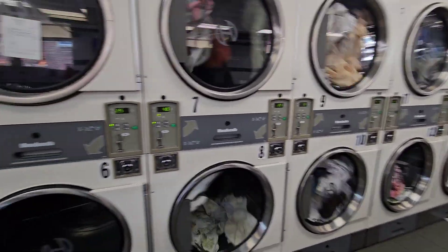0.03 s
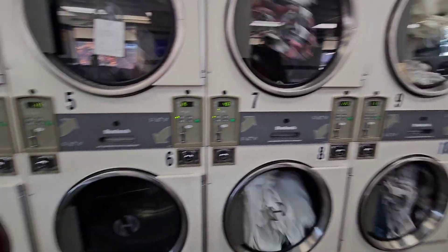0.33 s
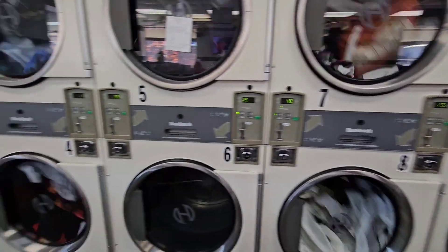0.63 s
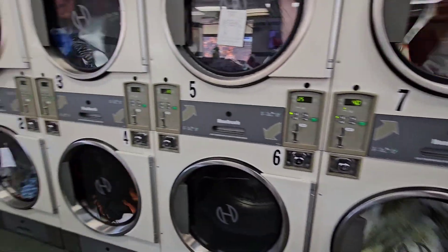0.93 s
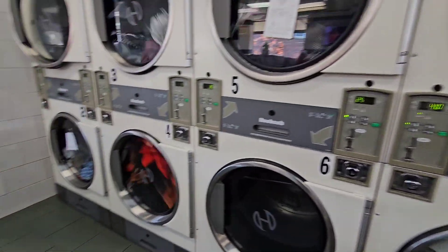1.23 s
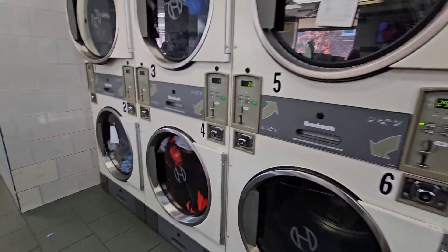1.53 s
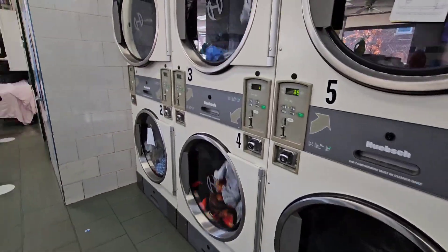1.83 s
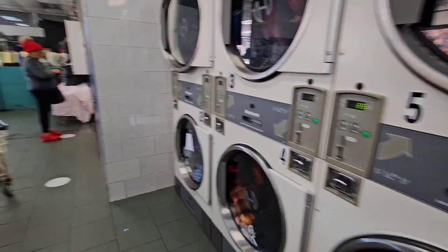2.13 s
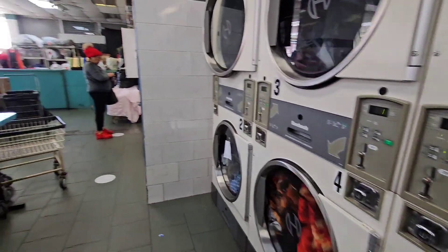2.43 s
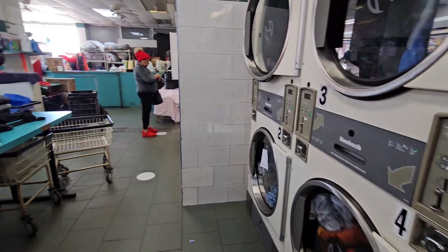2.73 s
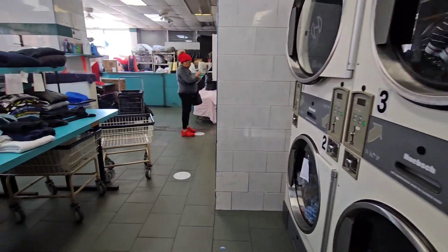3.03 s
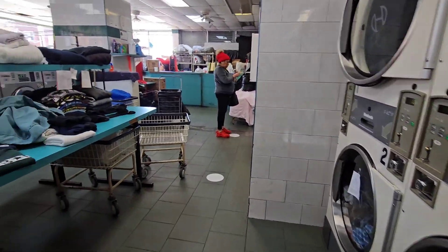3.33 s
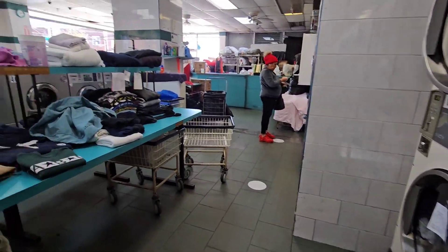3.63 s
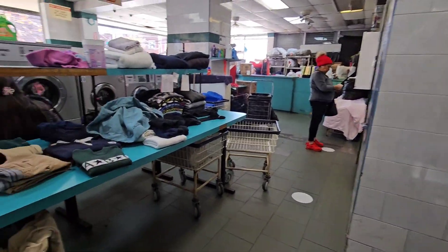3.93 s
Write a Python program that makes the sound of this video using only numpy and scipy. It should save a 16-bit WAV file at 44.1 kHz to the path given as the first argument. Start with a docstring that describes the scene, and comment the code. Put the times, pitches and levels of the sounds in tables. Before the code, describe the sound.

Tumble dryers rumble and hum steadily, with a light metallic jingle near the end.

```python
"""A walk along a row of tumble dryers in a tiled laundromat.
From the start, motors drone against the mains hum, drums rumble and air rushes through the ducts.
Laundry thuds and swishes, buttons tick, and faint blower tones swell as each machine is passed.
Past halfway a panel buzzes in surges and a bright hiss grows.
Near the end, after a few stray clinks, small metal things, perhaps coins, jingle."""
import sys
import numpy as np
from scipy import signal
from scipy.fft import rfft, irfft
from scipy.io import wavfile

SR = 44100
rng = np.random.default_rng(int(sys.argv[2]) if len(sys.argv) > 2 else 0)


def waveform_to_disk(signal):
    """Save audio, clipped to [-1, 1], as 16-bit WAV at the path in sys.argv[1]."""
    frames = np.transpose(np.atleast_2d(signal))
    scaled = np.clip(frames, -1, 1) * 32767
    samples = np.round(scaled).astype(np.int16)
    wavfile.write(sys.argv[1], SR, samples)


N = 176400


def motors():
    """Spinning shafts drone, motors beat against the mains hum, and a shaken panel buzzes."""
    # drone at the rate the shaft turns (time [s], level [dB])
    drone_levels = [(0, -29.5), (.6, -26.5), (1.05, -27), (1.3, -25), (1.9, -23), (2.7, -21.5),
                    (2.9, -26.5), (3.45, -23.5), (3.95, -30.5)]
    # hum near twice the shaft and mains rates, swelling and breaking up (time [s], level [dB])
    hum_levels = [(0, -29.5), (.14, -32.5), (.22, -27), (.38, -23), (.5, -43.5), (.56, -25), (.68, -41),
                  (.79, -29), (.92, -41), (1.02, -27.5), (1.17, -23.5), (1.27, -47), (1.48, -31),
                  (1.63, -26.5), (1.75, -32.5), (1.84, -31), (2.02, -36), (2.08, -25.5), (2.2, -37),
                  (2.37, -22.5), (2.45, -40), (2.53, -27), (2.62, -35), (2.68, -23.5), (2.76, -24.5),
                  (2.83, -30.5), (3.03, -28.5), (3.1, -29), (3.19, -28), (3.32, -39), (3.42, -26.5),
                  (3.55, -24), (3.69, -33), (3.92, -23.5), (3.96, -31)]
    # surges of the panel's buzz (time [s], level [dB])
    buzz_levels = [(0, -47.5), (1.4, -48), (2.3, -41.5), (2.46, -46.5), (2.54, -33), (2.66, -42.5),
                   (2.78, -32.5), (2.87, -39), (2.95, -35), (3.2, -40), (3.28, -38.5), (3.35, -47),
                   (3.44, -36.5), (3.55, -36.5), (3.65, -42.5), (3.95, -48)]
    shaft_hz, mains_hz, hum_hz = 58.7, 60, 119.4
    drone = tone(shaft_hz, wander=.0023, rate=2.2) * gain(curve(drone_levels) + .46 * drift(12))
    hum = tone(hum_hz, wander=.0083, rate=5.2) * gain(curve(hum_levels))
    buzz = tone(6 * mains_hz, wander=.006, rate=12) * gain(curve(buzz_levels) + 2.3 * drift(12))
    return (drone + hum + buzz) * pan(.7)


def drums():
    """The turning drums make a deep, slightly uneven rumble."""
    # tone colour of the rumble (frequency [Hz], relative level [dB])
    rumble_colour = [(15, -24), (25, -6), (36, 1), (55, 1.5), (80, -.5), (100, -1), (125, -1.5), (145, -2),
                     (180, -1.5), (275, -6), (380, -5), (450, -13.5), (600, -17), (800, -30.5),
                     (1400, -47.5)]
    # loudness along the row (time [s], level [dB])
    rumble_levels = [(0, -28), (.8, -28.5), (1.4, -26.5), (2.1, -28), (2.7, -28), (3.3, -28), (3.95, -28)]
    return flickering_noise(rumble_colour, flicker_db=.97, rate=4.1) * gain(curve(rumble_levels))


def air():
    """Air rushes through ducts and whistles through gaps; a hiss fades, then grows down the row."""
    # tone colour of the rush (frequency [Hz], relative level [dB])
    rush_colour = [(300, -2.5), (700, 6), (900, 2), (1050, 2.5), (1180, 0), (1550, 0.5), (1800, -2.5),
                   (2050, -2), (3100, -7), (4000, -5.5), (4800, -6), (6000, -5.5), (6800, -7.5),
                   (7350, -7.5), (7900, -11.5), (8800, -10.5), (9600, -20), (10800, -15), (12200, -13),
                   (13800, -32), (15800, -31)]
    # thin whistles (pitch [Hz], level [dB], width [octaves])
    gaps = [(1032, -56, 0.027), (2000, -61.5, 0.022), (2493, -70.5, 0.0036), (2730, -69.5, 0.0027),
            (4700, -61, 0.022), (7390, -61.5, 0.017)]
    # tone colour of the hiss (frequency [Hz], relative level [dB])
    hiss_colour = [(2000, -9.5), (3500, -3.5), (5000, 2.5), (6500, -2), (8500, -4), (9800, -13),
                   (12000, -4.5), (15500, -13)]
    # loudness of the hiss (time [s], level [dB])
    hiss_levels = [(0, -47.5), (1.5, -60), (2.2, -53), (2.6, -48), (3.15, -48), (3.5, -44.5), (3.95, -47)]
    rush = flickering_noise(rush_colour, flicker_db=.92, rate=8.3) * gain(-41.5)
    jets = room_noise()
    whistles = sum(gain(db) * filtered(jets, band(hz, octaves)) for hz, db, octaves in gaps)
    hiss = filtered(room_noise(), colour(hiss_colour)) * gain(curve(hiss_levels))
    return rush + whistles + hiss


def laundry():
    """Falling laundry lands with soft thuds, and cloth swishes over the drum wall."""
    # loads landing (time [s], level [dB], centre frequency [Hz])
    thuds = [(.29, -35, 312), (.66, -37, 180), (1.33, -31, 228), (1.99, -33.5, 280), (2.55, -34, 327),
             (3.46, -35, 195), (3.88, -32.5, 175)]
    # cloth sliding (time [s], level [dB], centre frequency [Hz], width [octaves], half length [s])
    swishes = [(0.493, -45.5, 2200, 1.2, 0.023), (1.153, -46, 1500, 0.5, 0.026),
               (1.143, -46.5, 5770, 0.56, 0.019), (1.37, -45, 620, .3, .05),
               (1.767, -48, 4000, 0.89, 0.035), (1.865, -48.5, 6900, 0.16, 0.055),
               (2.107, -47, 6700, 0.2, 0.033), (2.46, -51, 4770, .08, 0.06), (2.487, -52, 11900, .06, .04),
               (2.496, -46, 6700, .33, 0.032), (2.512, -47.5, 1580, 0.51, 0.067),
               (3.335, -52, 2250, .2, .025), (3.46, -48, 6600, 0.12, .02), (3.78, -51, 2200, .2, .025)]
    rise_s, fall_s = .034, .027
    t, out = times(), 0
    thud_noise, swish_noise = room_noise(), room_noise()
    for at, db, hz in thuds:
        swell = bell(t - at, np.where(t < at, rise_s, fall_s))
        out += gain(db) * swell * filtered(thud_noise, band(hz, octaves=.28))
    for at, db, hz, octaves, half_length in swishes:
        out += gain(db) * bell(t - at, half_length) * filtered(swish_noise, band(hz, octaves))
    return out


def coins():
    """Small metal things strike, scrape and ring; the tiled room holds the ring a little longer."""
    # clinks (time [s], level [dB], favoured pitch [Hz], relative scrape [dB], relative strike [dB])
    clinks = [(.474, -49, 13600, 1, -4), (2.27, -56, 12600, 1, -10), (2.742, -49, 15100, -5, -2),
              (3.13, -51, 14400, -4, -6), (3.318, -50, 12600, 2, -12), (3.341, -40.5, 14100, 2.5, -3),
              (3.358, -46, 13600, -6, -8), (3.409, -42, 12600, -5, 1), (3.492, -38, 12950, -1, 1),
              (3.506, -33.5, 8900, -8, -4), (3.509, -41, 14100, -6, -8), (3.518, -41, 9530, 1, -2),
              (3.682, -37, 13400, -16, -14), (3.719, -34.5, 14150, -12, 10), (3.731, -40, 14300, -6, -2),
              (3.777, -39, 14100, -2, -3), (3.78, -43.5, 9530, -10, -4), (3.799, -41, 12600, -4, -4),
              (3.858, -39, 10850, -12, -10), (3.876, -39, 12600, -10, -12), (3.885, -37, 8100, -10, -1),
              (3.889, -38, 12900, -3, 1), (3.95, -42.5, 10850, -6, -6)]
    # notes the metal rings with (pitch [Hz], relative level [dB], time to fade by 60 dB [s])
    notes = [(7330, -5, .12), (7800, 0, 0.096), (8500, -8, .12), (9517, -4.5, .13), (10844, -5.5, 0.13),
             (12578, -1.5, 0.15), (12913, -9, 0.099), (14200, -5, 0.11), (14400, -7, .07)]
    # tone colour of metal scraping on metal (frequency [Hz], relative level [dB])
    scrape_colour = [(2000, -12), (4500, 0), (8000, -2), (10000, -7), (12600, 3), (15500, -4)]
    strike_s, scrape_s, room_s = .017, .21, .5  # times to fade by 60 dB
    rise_s, detune, favoured_octaves = .0012, .0008, .17
    out = np.zeros((2, N))
    scrape_noise = filtered(room_noise(), colour(scrape_colour))
    room = room_noise()
    chatter = normalise(gain(1.5 * drift(120)))  # the level trembles quickly
    echoes = [gain(-3.5) * filtered(room, band(hz, octaves=.012)) for hz, _, _ in notes]
    for at, db, pitch, scrape_db, strike_db in clinks:
        start = min(int(at * SR), N - 1)
        age = np.arange(N - start) / SR
        strike_noise = filtered(room, band(pitch, octaves=.043))[:, start:]
        metal = gain(strike_db) * strike_noise * fade(age, strike_s)
        room_tail = gain(-15) * fade(age, room_s)
        for echo, (hz, note_db, ring_s) in zip(echoes, notes):
            detuned_hz = hz * (1 + detune * rng.standard_normal())
            ring = np.sin(2 * np.pi * (detuned_hz * age + rng.random((2, 1))))
            ring += random_stretch(echo, start)
            # notes far from the favoured pitch ring less
            strength = gain(note_db) / (1 + (2 * np.log2(hz / pitch) / favoured_octaves) ** 2)
            metal += strength * ring * np.hypot(fade(age, ring_s), room_tail)
        scrape = gain(scrape_db) * random_stretch(scrape_noise, start) * fade(age, scrape_s)
        onset = 1 - np.exp(-age / rise_s)
        out[:, start:] += gain(db) * (metal * pan(6) + scrape) * onset
    return out * chatter


def blowers():
    """Faint fan tones swell as each machine is passed and flutter differently left and right."""
    # fans (pitch [Hz], level when closest [dB], left over right [dB], time when closest [s])
    fans = [(177.7, -41.5, 1.5, 0.65), (235.4, -42.5, 3, 0.72), (468.5, -48.5, 4, 3.9), (502, -51, 5, 1.4),
            (590.4, -50, 2.5, 1.9)]
    flutter_db, passing_s = 4.5, 1.17
    out = 0
    for hz, db, pan_db, closest in fans:
        wobble = drift(9.5) + np.array([drift(4.8), drift(3.6)]) / 2
        flutter = normalise(gain(flutter_db * wobble))
        distance = np.hypot(1, (times() - closest) / passing_s)  # 1 when closest
        out += tone(hz, wander=.006, rate=11) * flutter * gain(db) * pan(pan_db) / distance
    return out


def buttons():
    """Buttons and zips tick faintly at random, each tick smeared by the drum and the room."""
    ticks_per_s, fade_s = 45, .085
    hits = rng.random(N) < ticks_per_s / SR
    # each hit makes the level jump, then die away
    envelope = signal.lfilter([1], [1, -fade(1 / SR, fade_s)], hits + 1e-18)
    return normalise(envelope * filtered(room_noise(), band(4500, octaves=.7))) * gain(-57)


def room_noise():
    """Left and right spectra of noise in a room: alike in the bass, unrelated in the treble."""
    # how the room's sound leans to one side (frequency [Hz], left over right [dB])
    balance = [(60, 2.5), (180, 1.8), (350, 1.1), (700, 2.5), (1500, 2.6), (2800, 3), (4600, -1.5),
               (7000, 3.5), (10000, 1), (14000, 2.5)]
    spacing_m, sound_m_per_s = .16, 343
    alike = np.sinc(2 * freqs() * spacing_m / sound_m_per_s)
    mid, side = rfft(rng.standard_normal((2, N)))
    mid, side = mid * np.sqrt(1 + alike), side * np.sqrt(1 - alike)
    lean = np.sqrt(colour(balance))
    return np.array([(mid + side) * lean, (mid - side) / lean])


def flickering_noise(rows, flicker_db, rate, octaves=10):
    """Room noise with a given tone colour, each octave flickering on its own."""
    spectra, out = room_noise() * colour(rows), 0
    position = np.clip(np.log2(freqs() / 20), 0, octaves - 1)
    for octave in range(octaves):
        share = np.maximum(1 - abs(position - octave), 0)
        out += irfft(spectra * share, N) * gain(flicker_db * drift(rate))
    return normalise(out)


def tone(hz, wander, rate):
    """A pure tone of average strength 1 whose pitch strays by about the fraction wander."""
    cycles = np.cumsum(hz * (1 + wander * drift(rate))) / SR
    return np.sqrt(2) * np.sin(2 * np.pi * (cycles + rng.random()))


def drift(rate):
    """A smooth random wobble of size about 1, changing about rate times a second."""
    spectrum = rfft(rng.standard_normal(N)) * bell(freqs(), rate)
    spectrum[0] = 0  # centre the wobble on zero
    return normalise(irfft(spectrum, N))


def filtered(spectra, gains):
    """Turn noise spectra into sound of average strength 1, with a gain for each frequency."""
    return normalise(irfft(spectra * gains, N))


def random_stretch(noise, start):
    """A random piece of noise, long enough to last from sample start to the end."""
    return np.roll(noise, rng.integers(N), axis=1)[:, start:]


def colour(rows):
    """A gain for each frequency from (frequency [Hz], level [dB]) rows."""
    hz, db = np.array(rows).T
    return gain(np.interp(np.log(freqs()), np.log(hz), db))


def band(hz, octaves):
    """Gains that keep only the frequencies around hz."""
    return bell(np.log2(freqs() / hz), octaves)


def bell(offset, width):
    """A smooth hill, 1 high where offset is zero."""
    return np.exp(-.5 * (offset / width) ** 2)


def fade(age, seconds):
    """Die away by 60 dB in the given time."""
    return np.exp(-np.log(1000) * age / seconds)


def curve(rows):
    """Join (time [s], value) rows with straight lines."""
    return np.interp(times(), *np.array(rows).T)


def pan(db):
    """Two gains that make the left side db louder than the right."""
    return gain(np.array([[db], [-db]]) / 2)


def gain(db):
    """Turn decibels into a multiplier."""
    return 10 ** (np.asarray(db) / 20)


def normalise(x):
    """Scale to an average strength (rms) of 1."""
    return x / np.sqrt(np.mean(x ** 2) + 1e-20)


def times():
    """The time of each sample in seconds."""
    return np.arange(N) / SR


def freqs():
    """The frequency of each point of a spectrum in Hz."""
    return np.maximum(np.arange(N // 2 + 1) * SR / N, 1)


def scene():
    """All the machines and the small sounds inside them."""
    return motors() + blowers() + drums() + air() + laundry() + buttons() + coins()


def record(dry):
    """Fade out quickly just before the end and cut away the highest treble."""
    stop_s, fade_s, top_hz = 3.975, .012, 15750
    fade_out = np.clip((stop_s - times()) / fade_s, 0, 1)
    treble_cut = signal.ellip(12, .1, 90, top_hz, fs=SR, output="sos")
    return signal.sosfilt(treble_cut, dry * fade_out)


dry = scene()
out = record(dry)
waveform_to_disk(out)
```